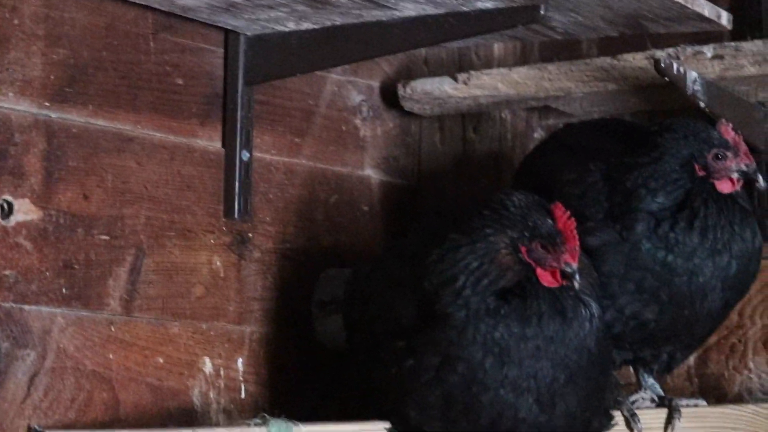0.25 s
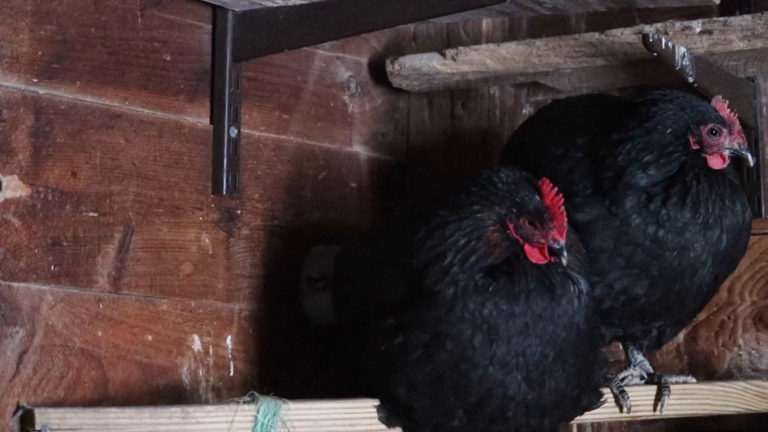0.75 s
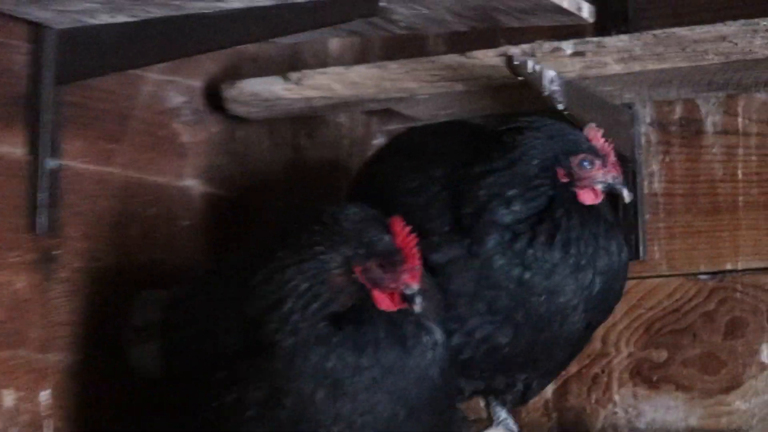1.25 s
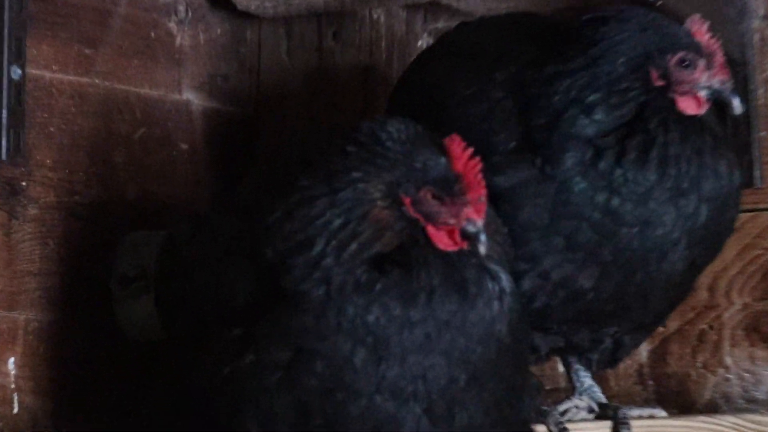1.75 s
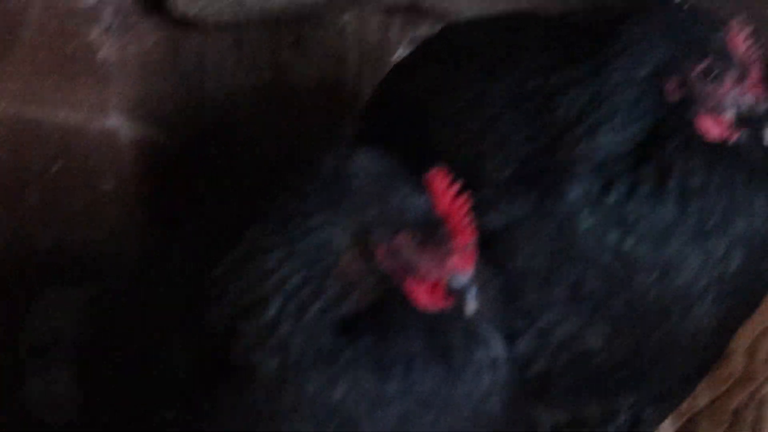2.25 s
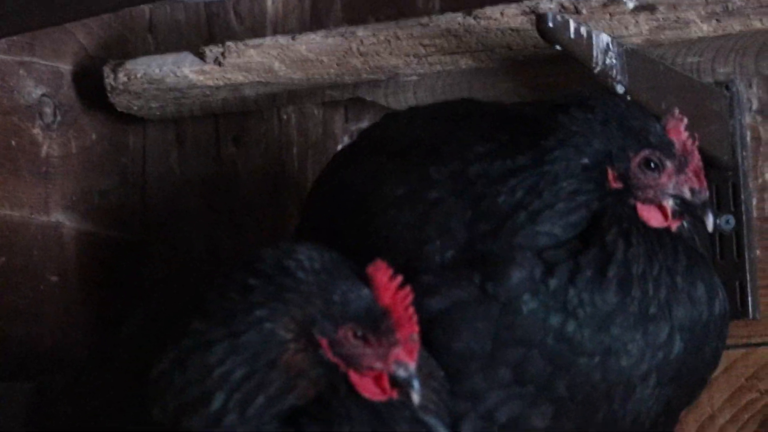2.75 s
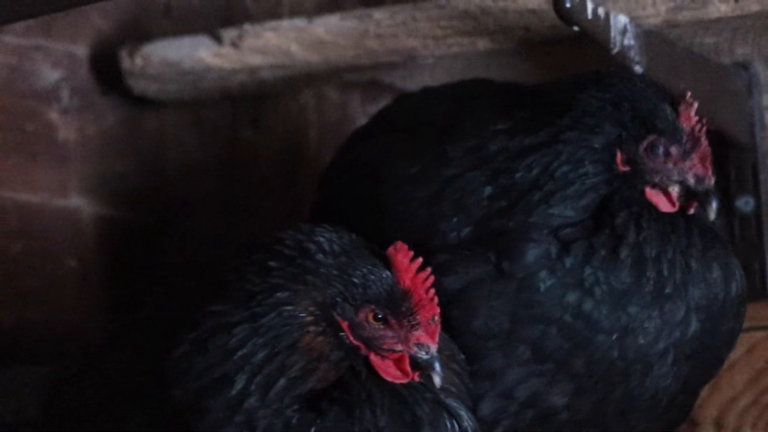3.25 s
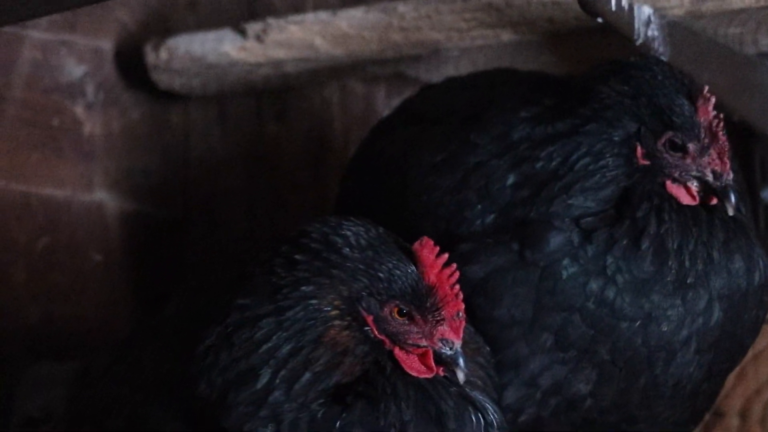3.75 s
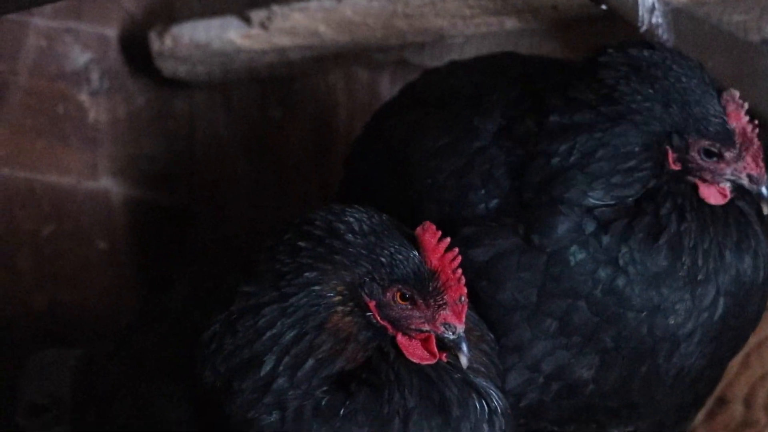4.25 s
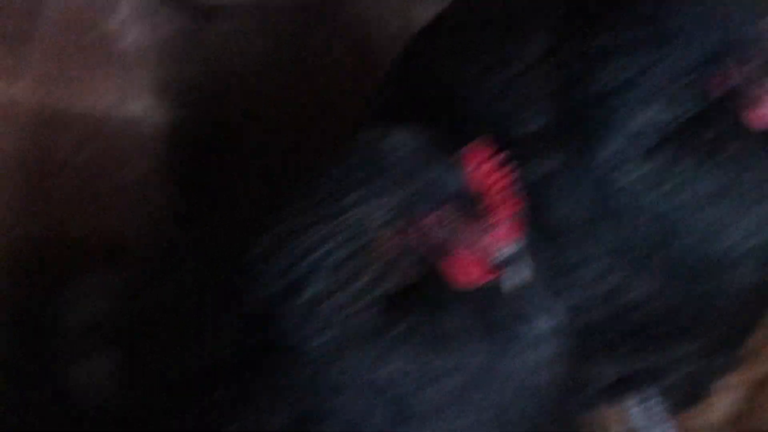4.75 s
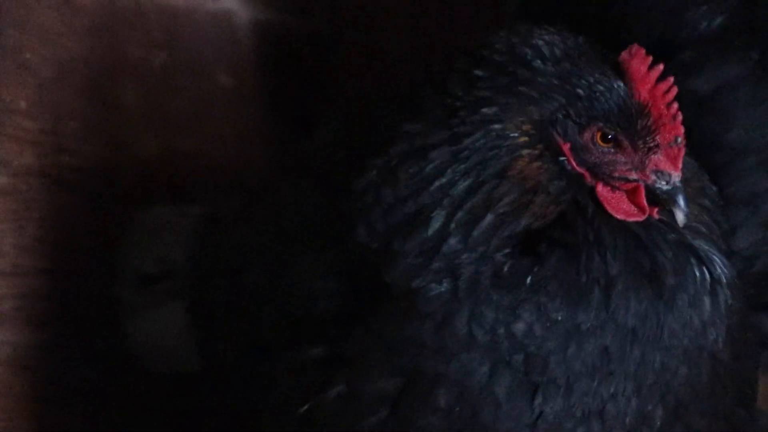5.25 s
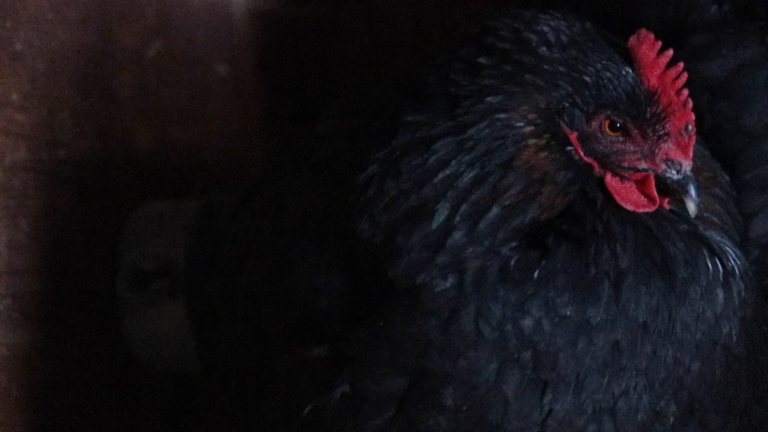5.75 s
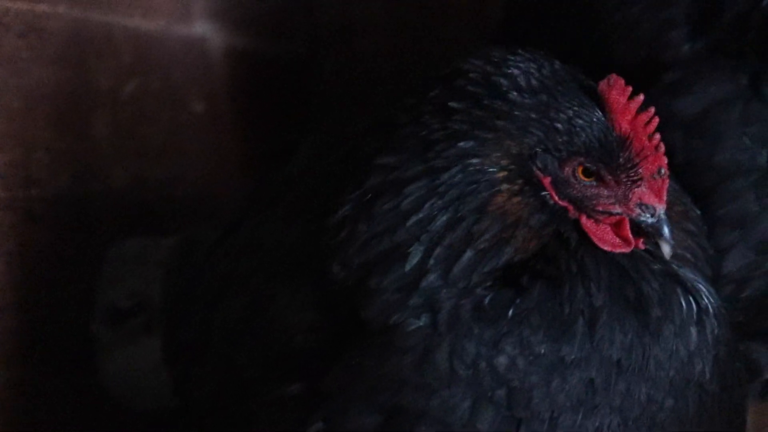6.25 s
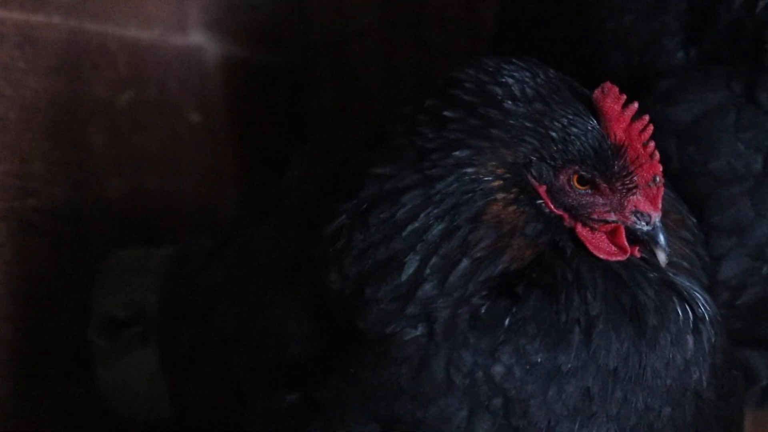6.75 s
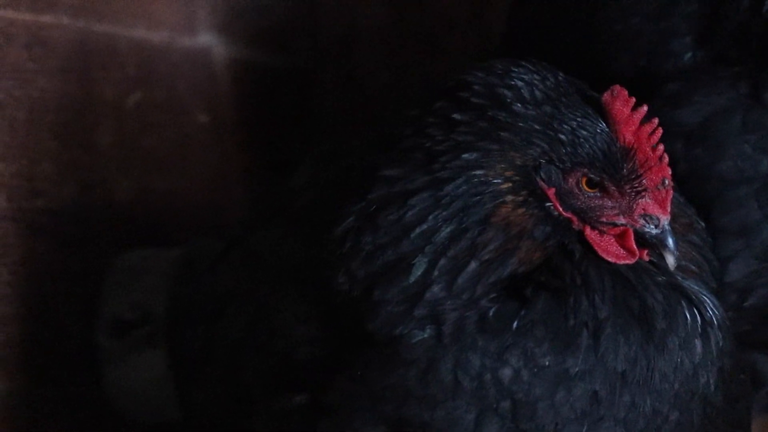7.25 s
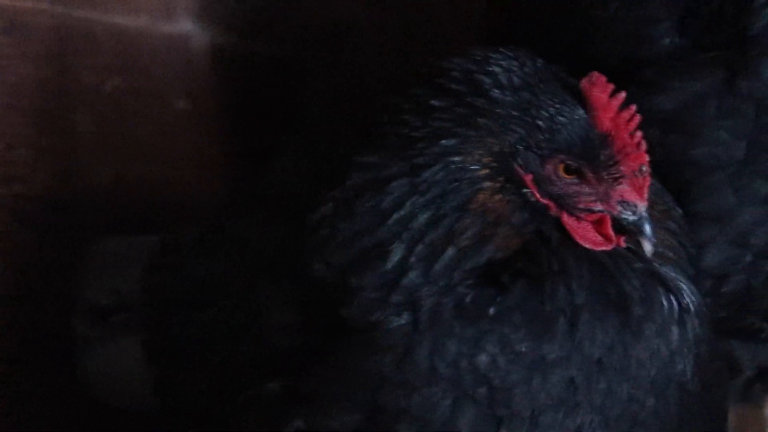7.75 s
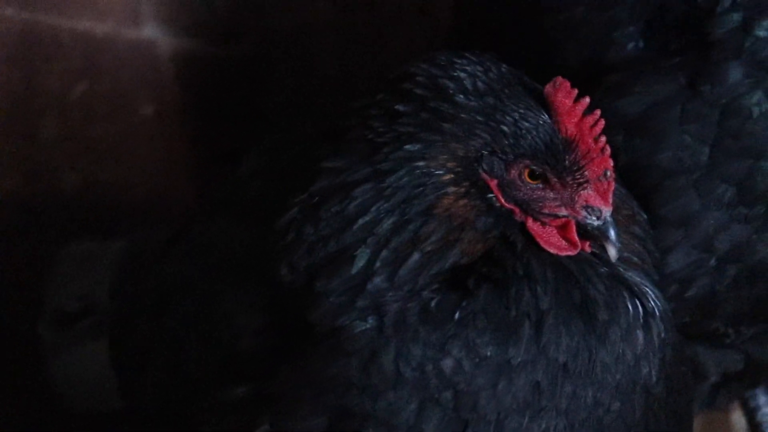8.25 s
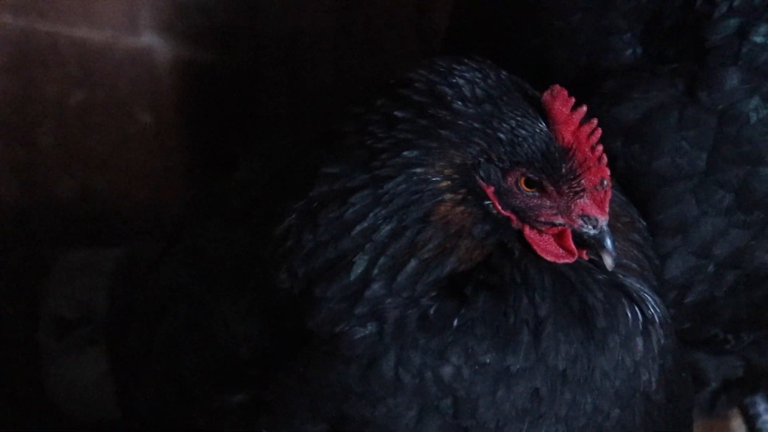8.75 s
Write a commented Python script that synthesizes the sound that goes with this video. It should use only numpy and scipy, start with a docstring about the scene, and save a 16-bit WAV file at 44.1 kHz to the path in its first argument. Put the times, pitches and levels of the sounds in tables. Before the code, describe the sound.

Close, drawn-out hen moans, a quiet gap, soft croons, then a swelling, squeaky, raspy whine and faint clucks amid claw taps on wood.

```python
"""A small wooden coop, hens roosting close to a camera: moans together, soft croons, short clucks, and
a long rising whine that cracks into squeaks and ends in a rasp.
Voices are harmonic sums on a jittering phase; rasps are slow pulse trains with puffs of air.
Claws and beaks tick on the perch as decaying noise through wood resonances, and feathers rustle.
The boards answer the hens with short noise tails; shaped noise makes the hiss and the low bumps."""
import sys
import numpy as np
from scipy import signal
from scipy.fft import rfft, irfft, next_fast_len
from scipy.io import wavfile
from scipy.ndimage import map_coordinates

SR = 44100
rng = np.random.default_rng(int(sys.argv[2]) if len(sys.argv) > 2 else 0)


def waveform_to_disk(signal):
    """Save audio, clipped to [-1, 1], as 16-bit WAV at the path in sys.argv[1]."""
    frames = np.transpose(np.atleast_2d(signal))
    scaled = np.clip(frames, -1, 1) * 32767
    samples = np.round(scaled).astype(np.int16)
    wavfile.write(sys.argv[1], SR, samples)


N = 397778

# Levels in the tables are relative dB: gains in scene() and the coop act on top.
# Long whine, swelling as it climbs: (time [s], pitch [Hz], level of the fundamental [dB])
WHINE_PATH = [(4.78, 745, -53), (4.921, 857, -39), (5.081, 887, -41.5), (5.24, 886.4, -34),
              (5.801, 937.4, -28), (5.901, 1001, -25), (6.159, 1045, -32), (6.62, 1043, -28.5),
              (6.885, 1039, -32)]
# Upward cracks of the whine: (time [s], length [s], leap [ratio of its pitch])
SQUEAKS = [(4.975, 0.035, 1.25), (5.103, 0.038, 1.16), (5.257, 0.05, 1.36), (5.346, 0.0355, 1.5),
           (5.436, 0.04, 1.33), (5.517, .034, 1.38), (5.608, 0.056, 1.3), (5.742, 0.064, 1.39),
           (5.858, .066, 1.19), (5.951, .06, 1.17), (6.173, .046, 1.35), (6.451, .1, 1.39)]
# Hen presses harder, whine swells and goes flat: (time [s])
PUSH_TIMES_S = [5.255, 5.59, 5.737, 5.835, 6.281, 6.585, 6.845]
# Harsh stretches of the whine: (time [s], length [s], level [dB])
WHINE_RASPS = [(6.25, 0.15, -40.5), (6.48, .24, -43), (6.68, 0.226, -38)]
# Drawn-out moans, one pitch arc each: (time [s], length [s], first [Hz], middle [Hz], last [Hz],
# level [dB], attack [s], release [s], overtones [dB], roughness [0-1])
MOANS = [(0, 0.35, 289, 302.8, 291, -29.5, 0.0012, 0.15, -9.5, 0.03),
         (0, 0.11, 596, 607, 630, -30.5, 0.0033, 0.031, 1, 0.18),
         (.09, .44, 685, 738, 787, -35, 0.026, 0.086, 5.5, 0.2),
         (.1, 0.253, 431, 460, 459, -30, 0.15, .04, -13.5, .08),
         (.32, .61, 444.6, 474.5, 477, -27.5, 0.029, 0.026, -6, 0.11),
         (.74, 0.28, 285, 296, 304.5, -39.5, .16, 0.058, -4, 0.31)]
# Soft croons: (time [s], length [s], first [Hz], middle [Hz], last [Hz],
# level [dB], attack [s], release [s], overtones [dB], roughness [0-1])
CROONS = [(2.74, .17, 750, 590, 565, -47, .03, 0.015, -0.5, 0.21),
          (2.89, 0.24, 597, 613, 629.4, -34, 0.02, 0.022, -5.5, 0.1),
          (3.1, 0.44, 648, 722, 719, -35, .05, 0.29, -5.5, 0.13),
          (2.65, 1.2, 273.4, 268.5, 269, -56.5, 0.19, .5, 2, .14),
          (3.79, .21, 570, 463, 579, -35, 0.065, 0.076, -9.5, 0.17),
          (6.46, 0.2416, 250, 207.8, 234.4, -49.5, .05, 0.061, -0.5, .3),
          (8.61, 0.1247, 642, 583, 663, -52.5, 0.033, 0.02, 9, 0.44),
          (8.71, 0.3, 679, 865, 885, -44.5, 0.089, .005, 17.5, 0.31)]
# Harsh stretch of the moan: (time [s], length [s], level [dB])
MOAN_RASPS = [(0, 1.0, -36)]
# Short throaty notes: (time [s], length [s], pitch [Hz], glide [share of pitch], level [dB],
# roughness [0-1])
CLUCKS = [(0.656, 0.078, 667, -0.1, -34.5, 0.27), (3.152, 0.074, 567.4, -0.0039, -36.5, 0.06),
          (3.297, 0.058, 295, -0.15, -44, 0.56), (3.418, 0.029, 648, -0.21, -39.5, 0.33),
          (4.832, 0.07, 501, -0.08, -42.5, 0.62), (6.059, 0.0523, 424, -0.43, -27.5, 0.71),
          (6.231, .044, 466.4, 0.19, -30.5, 0.59), (6.286, 0.063, 513, -.08, -34, 0.2),
          (6.431, 0.1078, 471.6, .2, -39.5, .88), (6.581, 0.093, 570.4, .03, -36.5, 0.3),
          (6.982, 0.0721, 380, -0.195, -48.5, 0.8), (7.212, 0.029, 366, -0.11, -51.5, 0),
          (8.311, 0.0529, 382.4, .05, -43.5, 0.34), (8.456, 0.067, 512, .14, -40, 0.33),
          (8.795, .062, 514, -.04, -41.5, 0.7), (8.972, .05, 538, -0.14, -36.5, 0.68)]
# Throat colour of held notes, read relative to the fundamental: (frequency [Hz], level [dB])
OVERTONES = [(300, 4.5), (600, -1.5), (950, -2.5), (1230, -6.5), (1480, -19.5), (1900, -27), (3000, -40.5),
             (3650, -42), (4500, -60)]
# Throat colour of the moan's rasp: (frequency [Hz], level [dB])
BEAK_SHUT = [(170, -17), (300, 2), (460, -3), (680, 3.5), (1050, -4), (1270, 4.5), (1600, -13.5),
             (2100, -20), (3000, -28), (3650, -12.5), (4500, -59)]
# Throat colour of the whine's rasp: (frequency [Hz], level [dB])
BEAK_OPEN = [(250, -38), (720, 0), (1050, -20), (1350, 4.5), (1600, -13), (2400, -21), (2750, -11.5),
             (3200, -23.5), (3800, -9.5), (4600, -40), (6500, -27), (10000, -76)]
# Throat colour of clucks: (frequency [Hz], level [dB])
CLUCK_THROAT = [(150, -15), (400, -1.5), (1000, -4), (1400, -11), (2000, -28.5), (5000, -37.5),
                (10000, -78)]
# Decay of the boards' answer: (frequency [Hz], t60 [s])
COOP_T60 = [(300, 0.25), (2000, 0.24), (10000, 0.063)]
# Claws and beaks on wood: (time [s], level [dB], knock relative to it [dB])
TICKS = [(.112, -25.5, -7), (0.37, -33.5, -11), (.746, -38, -27), (1.324, -22.5, -20), (1.949, -28, -21),
         (2.184, -20, -14), (3.033, -37, -2), (3.366, -34.5, -10), (3.669, -56, 10.5), (4.072, -53, 8),
         (4.49, -40.5, -5.5), (4.668, -53, 1), (4.767, -39.5, -11), (5.201, -27.5, -21),
         (5.539, -43.5, 4.5), (5.928, -30.5, -10.5), (7.135, -34.5, -15), (7.546, -37, -13.5),
         (8.791, -37, -5.5), (8.869, -36.5, -19)]
# Beak snapping shut: (time [s], level [dB])
BEAK_SNAPS = [(8.268, -26)]
# Colour of a claw contact: (frequency [Hz], level [dB])
CLAW = [(900, -24), (1700, -15.5), (2600, -4), (6000, -13), (9000, -9.5), (15500, -25.5)]
# Perch resonances: (frequency [Hz], width [Hz], level [dB])
PERCH_MODES = [(450, 170, 1), (1040, 480, 4), (1535, 570, 4), (2320, 340, 3), (3450, 600, -4)]
# Stirring feathers: (time [s], length [s], level [dB], rise [s])
STIRS = [(0, 0.41, -52, 0.0049), (.85, 1.585, -50, 0.84), (4.563, 1.05, -54.5, 0.26)]
# Colour of the rustle: (frequency [Hz], level [dB])
FEATHERS = [(60, -7.5), (400, -0.5), (650, -9), (2800, -12), (5000, -23.5), (9500, -20.5), (15500, -34)]
# Colour of still air and hiss: (frequency [Hz], level [dB])
AIR = [(22, -18), (60, -1.5), (130, -7), (250, -6), (1150, -12), (2500, -20.5), (5000, -26), (9600, -23.5),
       (15800, -34.5)]
# Camera shifting in the hand: (time [s], length [s], level [dB])
BUMPS = [(0.876, 0.39, -52.5), (4.061, .18, -47.5), (5.52, .204, -51), (6.073, .15, -48), (6.948, .25, -55)]
# Left-right likeness of background noise: (frequency [Hz], correlation [-1 to 1])
ALIKE = [(300, 0.74), (1000, 0.13), (3000, 0.0047)]

PUSH_S, PUSH_DB, PUSH_SAG_HZ = 0.0748, 6.5, 23.98
PURER_DB_PER_DB = 0.58  # the louder the whine, the weaker its overtones
LANDING_RATIO, SQUEAK_DB = 1.17, -7  # end of each squeak's glide; level relative to the whine
SCOOP_SHARE, SCOOP_S = 0.117, 0.0068  # a squeak slides up into its leap from below
LIFT_SHARE = .07  # each crack drags the lower note up, and it sinks back
GIVE_WAY_DB_PER_S = 135  # dip of the lower note per second of squeak length
WAVER_SHARE, WAVER_KNOTS_PER_S = 0.00506, 16.7  # unsteadiness of a held pitch
RASP_ATTACK_S, RASP_RELEASE_S = 0.02, 0.083
SETTLE_S, RESTING_DB = 0.51, -63  # each stir dies away to the rustle of resting hens
TOP_HZ = 15850


def amp(db):
    """Amplitude factor of a level in dB."""
    return 10 ** (np.asarray(db) / 20)


def unit(x):
    """x at rms 1."""
    return x / np.sqrt(np.mean(x ** 2) + 1e-20)


def along(points, hz):
    """(Hz, value) points interpolated on a log frequency axis."""
    point_hz, values = np.transpose(points)
    return np.interp(np.log(hz + 1), np.log(point_hz + 1), values)


def add(track, start_s, x):
    """Mix x into the track from start_s on."""
    start = max(round(start_s * SR), 0)
    part = track[..., start:start + x.shape[-1]]
    part += x[..., :part.shape[-1]]


def wobble(knots_per_s, size):
    """Smooth random curve through normally distributed knots."""
    knots = rng.standard_normal(int(size * knots_per_s / SR) + 4)
    return map_coordinates(knots, [np.arange(size) * knots_per_s / SR], mode="mirror")


def envelope(size, attack_s, release_s):
    """Smooth rise, hold and smooth fall."""
    t = np.arange(size) / SR
    ramp = np.minimum(t / attack_s, (t[-1] - t) / release_s)
    return np.sin(np.pi / 2 * np.clip(ramp, 0, 1)) ** 2


def fade(size, edge_s):
    """Equal soft start and stop."""
    return envelope(size, edge_s, edge_s)


def filtered(x, response):
    """x times a response of frequency in Hz."""
    size = x.shape[-1]
    padded_size = next_fast_len(size + 4096)
    spectrum = rfft(x, padded_size) * response(np.fft.rfftfreq(padded_size, 1 / SR))
    return irfft(spectrum, padded_size)[..., :size]


def coloured(x, spectrum):
    """x shaped by (Hz, dB) points, at rms 1."""
    return unit(filtered(x, lambda hz: amp(along(spectrum, hz))))


def syrinx(pitch_hz, rough):
    """Phase of the membranes: a quaver and faster jitter, both growing with roughness."""
    size = len(pitch_hz)
    quaver = .035 * np.sqrt(rough) * wobble(55, size)
    jitter = .09 * rough * wobble(420, size)
    return 2 * np.pi * np.cumsum(pitch_hz * (1 + quaver + jitter)) / SR


def puffs(phase, throat):
    """Turbulent air let through once a cycle, coloured by the throat."""
    return coloured(rng.standard_normal(len(phase)) * (1 + np.cos(phase)) ** 2, throat)


def call(pitch_hz, rough, overtone_db, flutter_db):
    """Held note: a fluttering fundamental under overtones that the throat shapes."""
    size = len(pitch_hz)
    phase = syrinx(pitch_hz, rough)
    tone = np.sin(phase)
    for k in range(2, 7):
        throat_db = along(OVERTONES, k * pitch_hz) - along(OVERTONES, pitch_hz)
        tone += amp(overtone_db + throat_db + 0.83 * wobble(21, size)) * np.sin(k * phase)
    falter = np.minimum(wobble(70, size), .5)  # breaks off more than it swells
    flutter = unit(amp(flutter_db * falter + 12 * rough * wobble(280, size)))
    return np.sqrt(2) * tone * flutter


def whine(rough, overtone_db, flutter_db, squeak_rough, squeak_overtone_db):
    """Long rising note with pushes; when it flips up into a thin gliding squeak, the lower note gives way."""
    times_s, pitches_hz, levels_db = np.transpose(WHINE_PATH)
    start_s = times_s[0]
    t = np.arange(start_s, times_s[-1], 1 / SR)
    pitch_hz = np.interp(t, times_s, pitches_hz)
    level_db = np.interp(t, times_s, levels_db)
    push, lift, dip_db, squeaks = np.zeros((4, len(t)))
    for s in PUSH_TIMES_S:
        add(push, s - PUSH_S / 2 - start_s, np.hanning(int(PUSH_S * SR)))
    for s, length_s, leap in SQUEAKS:
        size = int(length_s * SR)
        scoop = 1 - SCOOP_SHARE * np.exp(-np.arange(size) / SR / SCOOP_S)
        glide = np.linspace(leap, LANDING_RATIO, size) * scoop
        phase = syrinx(np.interp(s, t, pitch_hz) * glide, squeak_rough)
        window = fade(size, 0.0033)
        tone = np.sin(phase) + amp(squeak_overtone_db) * np.sin(2 * phase)
        squeak_db = np.interp(s, t, level_db) + SQUEAK_DB
        add(squeaks, s - start_s, amp(squeak_db) * unit(window * tone))
        add(dip_db, s - start_s, GIVE_WAY_DB_PER_S * length_s * window)
        add(lift, s - start_s, LIFT_SHARE * np.hanning(size) ** .5)
    effort_db = level_db + PUSH_DB * push
    bright_db = overtone_db - PURER_DB_PER_DB * (effort_db - level_db.mean())
    low_hz = pitch_hz * (1 + lift) - PUSH_SAG_HZ * push
    low = amp(effort_db - dip_db) * call(low_hz, rough, bright_db, flutter_db)
    out = np.zeros(N)
    add(out, start_s, low * fade(len(t), 0.0053) + squeaks)
    return out


def notes(rows, flutter_db):
    """Each note swells, holds and fades while its pitch bends through one parabolic arc."""
    out = np.zeros(N)
    for s, length_s, first_hz, middle_hz, last_hz, db, attack_s, release_s, overtone_db, rough in rows:
        u = np.linspace(-1, 1, int(length_s * SR))
        arc_hz = np.polyval(np.polyfit([-1, 0, 1], [first_hz, middle_hz, last_hz], 2), u)
        pitch_hz = arc_hz * (1 + WAVER_SHARE * wobble(WAVER_KNOTS_PER_S, len(u)))
        voice = call(pitch_hz, abs(rough), overtone_db, flutter_db)
        add(out, s, amp(db) * envelope(len(u), attack_s, release_s) * voice)
    return out


def rasp(rows, flap_hz, throat, rough):
    """Membranes flap slowly and unevenly: a rattle whose partials come and go, and puffs of air."""
    out = np.zeros(N)
    for s, length_s, db in rows:
        size = int(length_s * SR)
        phase = syrinx(np.full(size, flap_hz), rough / 3)
        partials = sum(amp(5 * wobble(12, size)) * np.cos(k * phase) for k in range(1, 27))
        pulses = coloured(partials, throat)
        rattle = np.sqrt(1 - rough) * pulses + np.sqrt(rough) * puffs(phase, throat)
        add(out, s, amp(db) * rattle * envelope(size, RASP_ATTACK_S, RASP_RELEASE_S))
    return out


def clucks():
    """Short gliding notes, part tone and part air, with the beak nearly shut."""
    out = np.zeros(N)
    for s, length_s, hz, glide, db, rough in CLUCKS:
        share = np.clip(rough, 0, 1)
        pitch_hz = hz * (1 + glide * np.linspace(-.5, .5, int(length_s * SR)))
        phase = syrinx(pitch_hz, share)
        tone = coloured(sum(np.sin(k * phase) / k ** 0.43 for k in range(1, 8)), CLUCK_THROAT)
        note = np.sqrt(1 - share) * tone + share * puffs(phase, CLUCK_THROAT)
        add(out, s, amp(db) * unit(note * fade(len(phase), 0.013)))
    return out


def coop(x, wet_db, pan_db, lag_ms):
    """Direct sound at two ports plus the boards' answer, short overlapping noise tails redrawn throughout."""
    answer, hop = np.zeros((2, N)), SR // 6
    padded = np.pad(x, (0, 2 * hop))
    for start in range(0, N, hop):
        piece = padded[start:start + 2 * hop] * np.hanning(2 * hop)
        if piece.any():
            # a fresh decaying noise tail for each piece
            hz, t, z = signal.stft(rng.standard_normal((2, 2 * hop)), SR, nperseg=256)
            t60_s = np.maximum(along(COOP_T60, hz), .02)[:, None]
            mid, side = signal.istft(z * amp(-60 * t / t60_s), SR, nperseg=256)[1]
            side = 2 * filtered(side, lambda f: f / (f + 600))  # long waves reach both ports alike
            tail = np.array([mid + side, mid - side])
            tail = tail / np.linalg.norm(tail[0])
            add(answer, start / SR + 0.001967, signal.fftconvolve(piece[None], tail, axes=1))
    sides = np.array([[1], [-1]])
    direct = filtered(x, lambda f: np.exp(1j * np.pi * f * sides * lag_ms / 1000))
    return amp(sides * pan_db / 2) * (direct + amp(wet_db) * answer)


def perch(hz):
    """Response of the wood: band resonances of alternating sign."""
    total = 0
    for k, (centre_hz, width_hz, db) in enumerate(PERCH_MODES):
        damping = 1j * hz * width_hz
        total = total + (-1) ** k * amp(db) * damping / (centre_hz ** 2 - hz ** 2 + damping)
    return total


def ticks(claw_db, knock_db, snap_db, scrape_t60_s):
    """Each contact is a sharp crack and a dying scrape that rings the perch; a beak snap is drier."""
    out, t = np.zeros((2, N)), np.arange(SR // 5) / SR

    def noise():
        return rng.standard_normal((2, len(t)))

    def knock():
        return unit(filtered(noise(), perch))

    for s, db, wood_db in TICKS:
        crack = 0.98 * amp(-60 * t / 0.0039)
        scrape = 0.62 * amp(-60 * t / scrape_t60_s + 2 * wobble(300, len(t)))
        contact = amp(claw_db) * coloured(noise(), CLAW) + amp(knock_db + wood_db) * knock()
        add(out, s, amp(db) * (crack + scrape) * contact)
    for s, db in BEAK_SNAPS:
        add(out, s, amp(db + snap_db - 60 * t / 0.017) * knock())
    return out * amp([[-1.3], [1.3]])


def rush(spectrum):
    """Stereo noise of rms 1, more alike in the bass than in the treble."""
    def mid_side(hz):
        turn = np.arccos(np.clip(along(ALIKE, hz), -1, 1)) / 2
        return np.array([np.cos(turn), np.sin(turn)])

    mid, side = filtered(rng.standard_normal((2, N)), mid_side)
    return coloured(np.array([mid + side, mid - side]), spectrum)


def feathers(rustle_db):
    """Soft flickering noise that swells with each stir."""
    stir = np.full(N, amp(RESTING_DB))
    for s, length_s, db, rise_s in STIRS:
        add(stir, s, amp(db) * envelope(int(length_s * SR), rise_s, SETTLE_S))
    flicker = amp(rustle_db + 1.47 * wobble(220, N))
    return stir * flicker * rush(FEATHERS) * amp([[-1.5], [1.5]])


def grip_bumps():
    """Low noise bursts as the hand-held camera shifts."""
    grip = np.zeros(N)
    for s, length_s, db in BUMPS:
        add(grip, s, amp(db) * fade(int(length_s * SR), 0.055))
    return grip * rush([(25, -29), (75, 2.5), (200, -12.0), (900, -70)])  # (Hz, dB)


def still_air(air_db):
    """Steady noise of still air and hiss."""
    return amp(air_db) * rush(AIR)


def scene():
    """Hens call from three places in the coop, over ticks, rustle, bumps and hiss."""
    harsh = .5
    whining = whine(rough=.18, overtone_db=2.2, flutter_db=5, squeak_rough=.24, squeak_overtone_db=-14.5)
    whining += rasp(WHINE_RASPS, 262, BEAK_OPEN, harsh)
    moans = notes(MOANS, flutter_db=2.5) + rasp(MOAN_RASPS, 155, BEAK_SHUT, harsh)
    croons = notes(CROONS, flutter_db=4.0) + clucks()
    hens = coop(whining, wet_db=-2.25, pan_db=1.5, lag_ms=0.098)
    hens += coop(moans, wet_db=-8, pan_db=-0.25, lag_ms=-0.17)
    hens += coop(croons, wet_db=-2.5, pan_db=0.64, lag_ms=-0.13)
    contacts = ticks(claw_db=-8.0, knock_db=7.3, snap_db=1.33, scrape_t60_s=0.17)
    return hens + contacts + feathers(rustle_db=4.53) + grip_bumps() + still_air(air_db=-50.5)


def record(dry):
    """The camera keeps nothing above its band limit."""
    return filtered(dry, lambda hz: hz < TOP_HZ)


dry = scene()
out = record(dry)
waveform_to_disk(out)
```